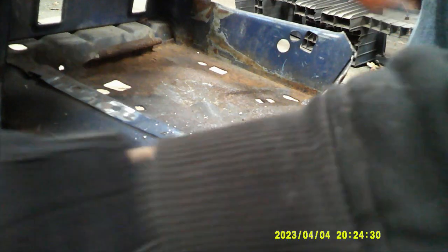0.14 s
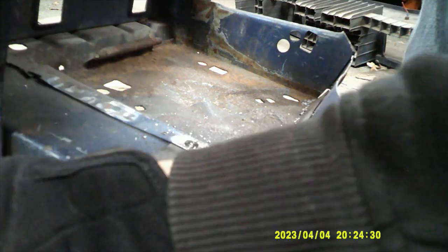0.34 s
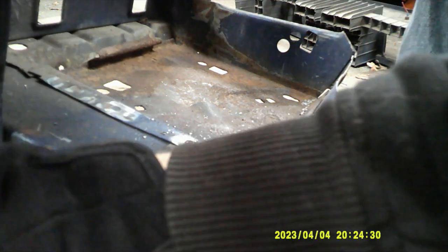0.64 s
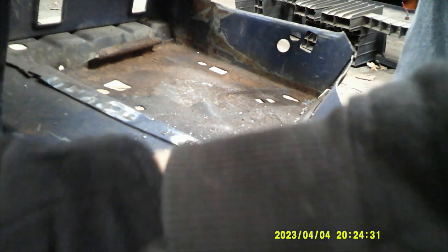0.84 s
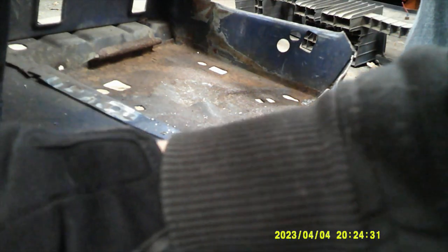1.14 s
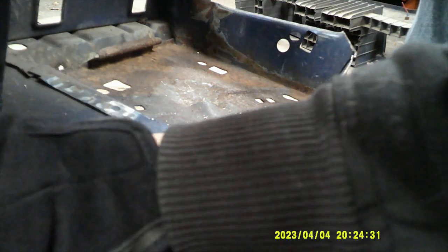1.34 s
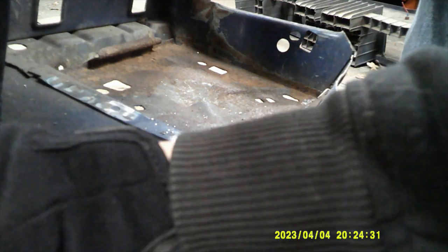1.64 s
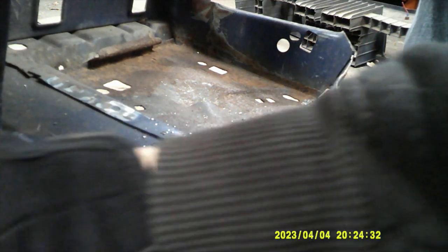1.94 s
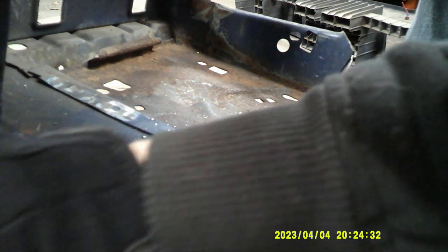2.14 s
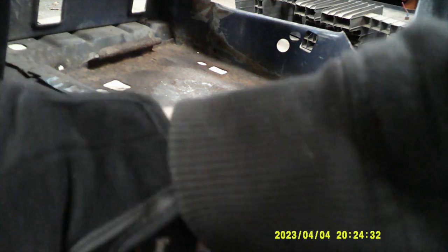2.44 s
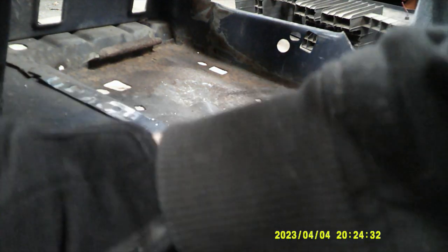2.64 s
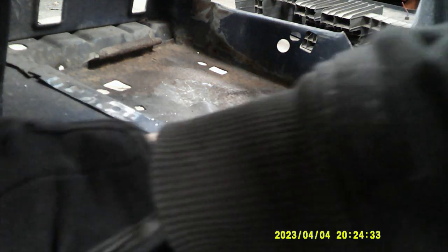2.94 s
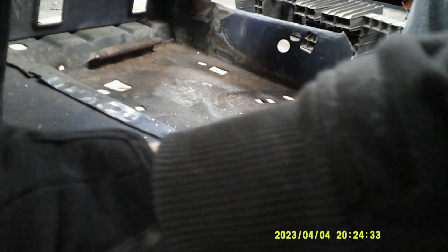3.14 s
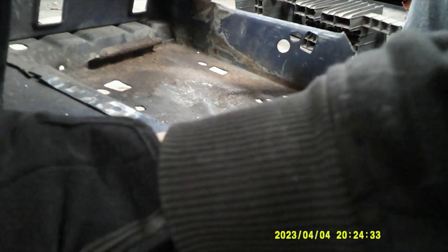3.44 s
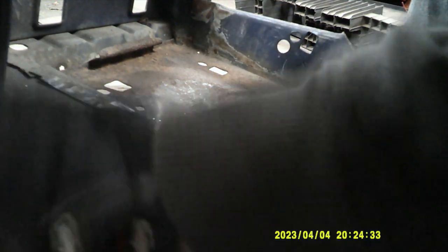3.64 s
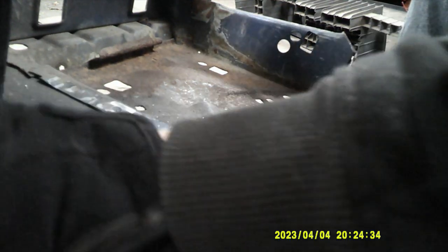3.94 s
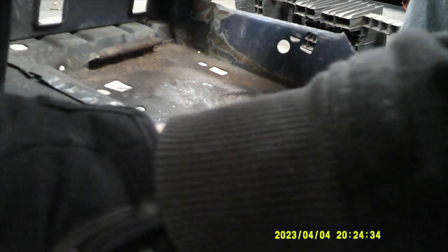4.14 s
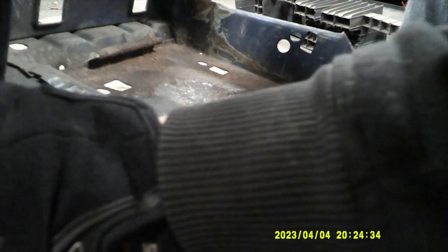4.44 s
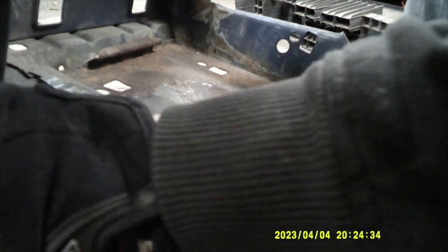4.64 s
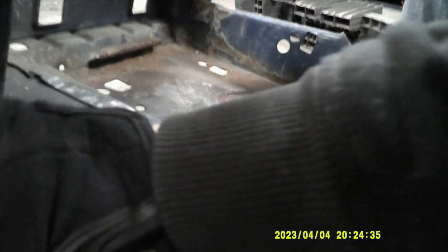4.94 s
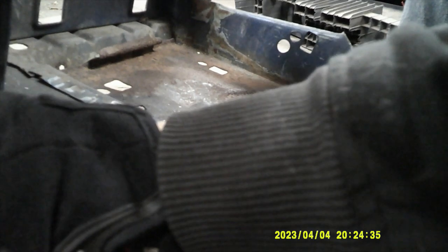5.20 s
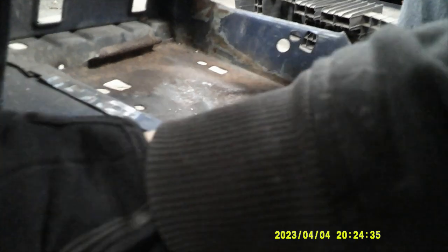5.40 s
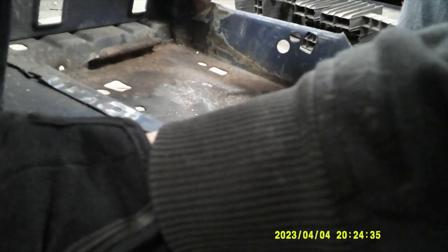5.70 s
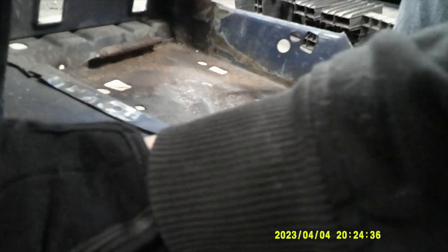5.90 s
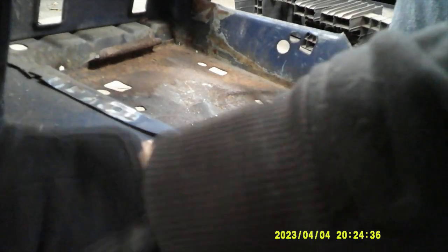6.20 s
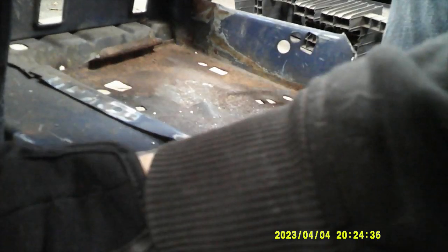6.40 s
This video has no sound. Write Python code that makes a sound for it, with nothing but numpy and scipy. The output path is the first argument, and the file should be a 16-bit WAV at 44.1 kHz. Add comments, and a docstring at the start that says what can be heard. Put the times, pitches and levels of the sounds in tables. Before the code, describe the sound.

A soft swish of cloth leads into scattered metallic taps and brief scratches as a chisel is positioned on a steel panel. About halfway through, eight loud hammer blows follow, a little over two a second. The first crack sharply; the later ones ring fuller as the chisel bites into the seam and rattles. The close microphone overloads a little, and a short workshop echo follows each strike.

```python
"""Hammer and chisel on welded panels

A steel chisel is set, tapped and dragged on sheet metal in a garage, close up; sleeves brush softly.
Then eight hammer blows drive it into a seam: steel cracks on steel, the wedged chisel rattles and the
panels clang and ring, loud enough to clip the converter and pull down a limiter."""
import sys
import numpy as np
from scipy import signal
from scipy.fft import rfft, irfft
from scipy.io import wavfile
from scipy.ndimage import uniform_filter1d

SR = 44100
rng = np.random.default_rng(int(sys.argv[2]) if len(sys.argv) > 2 else 0)


def wrap_up_sound(samples):
    """Save the sound to the file named by the first command line argument, as 16-bit audio."""
    columns = np.atleast_2d(samples).T
    # keep every value between -1 and 1, then stretch to whole-number steps
    tamed = np.clip(columns, -1, 1)
    steps = np.round(tamed * 32767).astype(np.int16)
    wavfile.write(sys.argv[1], SR, steps)


N = 289327

# free chisel: (frequency [Hz], level [dB], t60 [s])
CHISEL_MODES = [(1121, -16.5, 0.092), (1223, -6, 0.17), (1305, -15, 0.11), (1945, -14, 0.052),
                (2897, -15, 0.07), (3150, -20.5, 0.098), (5110, -29, 0.031), (6700, -37, 0.065),
                (6900, -23, 0.046)]
# steel-on-steel crack: (frequency [Hz], level [dB], t60 [s])
CRACK_MODES = [(2280, 8.5, 0.0055), (4480, -0.5, 0.011), (6200, -2, 0.094), (7000, -10.5, 0.039)]


def hammer_blows():
    """Each blow: a crack, the sheet's clang, the wedged chisel's rattle, panel modes swelling behind."""
    # (time [s], strength [dB], crack [dB], wedged chisel [dB], favoured pitch [Hz], its boost [dB])
    blows = [(3.315, 9, -1, -20, 865, 7), (3.640, 10.5, -10.5, -3.5, 2040, 3),
             (4.118, 10.5, -8.5, -13.5, 1350, 2), (4.483, 11.5, -13, -6.5, 1630, 3.5),
             (4.896, 13.5, -18, -14.5, 840, 2), (5.315, 12.5, -24, -6.5, 1300, 1.5),
             (5.777, 13, -17, -1, 1410, 3), (6.182, 15.5, -37, 0, 1015, 7.5)]
    # welded panels: (frequency [Hz], level [dB], t60 [s])
    panel_modes = [(151.2, -16.5, 1.29), (202, -1.5, 0.27), (291, -11, 0.48), (319, -9.5, 0.68),
                   (374, 4.5, 0.42), (402, -6.5, 1.17), (419.5, -1, 0.97), (464.3, -2.5, 1.45),
                   (557, -21.5, 0.26), (644, -1, 0.47), (660, -1, 0.67), (781, 3, .45), (835, 2.5, .4),
                   (965, -17, 0.39), (986, 1.5, 0.29), (1110, -17, 0.42), (1210, -2.5, 0.32),
                   (1315, -8, 0.74), (1430, -3.5, 0.29), (1523, -9.5, 0.57), (1670, -22.5, 1.5),
                   (1782, 1.5, 0.45)]
    out = np.zeros(N)
    ends_s = [row[0] for row in blows[1:]] + [N / SR]
    for k, ((start_s, db, crack_db, chisel_db, hz, boost_db), end_s) in enumerate(zip(blows, ends_s)):
        looseness = 0.22 ** k  # the chisel bites deeper with each blow
        length = np.interp(looseness, [0, 1], [.99, .74])
        tilt_db_oct = np.interp(looseness, [0, 1], [3.5, 2])
        panel_db = db + np.interp(k, [0, 3.4], [-20.5, -13])  # full grip after 3.4 blows
        add(out, start_s, amp(crack_db) * ring(CRACK_MODES, 0.13, spread_db=1.0, rise_s=0.00073))
        add(out, start_s, amp(db) * clang(length, tilt_db_oct, hz, boost_db, bass_rise_s=0.021))
        add(out, start_s, amp(chisel_db) * chisel_rattle())
        panel = ring(struck_at(panel_modes, hz, boost_db), .6, spread_db=1.2, rise_s=0.054)
        left_s = end_s - start_s - np.arange(len(panel)) / SR
        handover = np.clip(1 + left_s / 0.025, 0, 1)  # the next blow starts the ring afresh
        add(out, start_s, amp(panel_db) * panel * handover)
    return out


def clang(length, tilt_db_oct, centre_hz, boost_db, bass_rise_s):
    """Dense modes of sheet and garage: noise dying band by band, bass arriving late; length scales t60."""
    # (frequency [Hz], density [dB])
    spectrum = [(59, -71), (100, -47.5), (142, -25), (388, -3.5), (466, -0.5), (613, -4), (648, -3),
                (1590, -14), (1770, -13), (3300, -24), (4350, -34.5), (6630, -27), (7960, -49),
                (10300, -94.5), (17500, -120)]
    # (frequency [Hz], base t60 [s])
    decay = [(150, 1), (400, 0.39), (1000, 0.54), (2000, 0.52), (3500, 0.66), (7000, 0.53)]
    size = round(1.3 * np.clip(length, .1, 1) * SR)
    hz, t, bands = signal.stft(noise(size, spectrum, lines_db=2.0), SR, nperseg=256, noverlap=192)
    hz = hz[:, None]
    patches = uniform_filter1d(rng.standard_normal(bands.shape), size=3, axis=0)
    patches_db = 2.0 * unit_rms(uniform_filter1d(patches, size=30, axis=1))
    rise = 1 - np.exp(-(t + 0.00015) * (hz + 100) / (1000 * bass_rise_s))
    colour_db = tilt_db_oct * np.log2(hz / 1000 + 0.12) + favour_db(hz, centre_hz, boost_db) + patches_db
    bands = bands * rise * amp(colour_db - 60 * t / (length * lookup(decay, hz)))
    return signal.istft(bands, SR, nperseg=256, noverlap=192)[1][:size]


def chisel_rattle(duration_s=.55, blur_s=.011, rise_s=0.011):
    """The chisel rattles in the seam: each mode wanders in level and phase within the blur time."""
    # wedged chisel: (frequency [Hz], level [dB], t60 [s])
    wedged_modes = [(1712, -17, 0.48), (2280, -7, 0.5), (3100, -8.5, 0.66), (3280, -0.5, 0.57),
                    (3383, 2.5, 0.56), (4280, -10.5, 0.71), (5160, -16, 0.41), (6580, -4.5, 0.53)]
    hz, db, t60 = np.transpose(wedged_modes)[:, :, None]
    t = np.arange(round(duration_s * SR)) / SR
    shake = rng.standard_normal((2, len(wedged_modes), len(t)))
    width = round(blur_s * SR)
    sin_gain, cos_gain = unit_rms(uniform_filter1d(uniform_filter1d(shake, width), width))
    phase = 2 * np.pi * hz * t
    blurred = sin_gain * np.sin(phase) + cos_gain * np.cos(phase)
    return (amp(db - 60 * t / t60) * blurred).sum(0) * (1 - np.exp(-t / rise_s))


def chisel_knocks():
    """Light knocks: the chisel ticks, rings briefly and stirs the floor pan under it."""
    # (time [s], chisel [dB], clang [dB], floor pan [dB], length [factor], tilt [dB/octave],
    #  favoured pitch [Hz], its boost [dB])
    knocks = [(0.2215, -5, -20, -36, 0.21, 8.5, 403, 22), (0.329, -30, -35, -50, 0.11, 5.5, 6660, 11),
              (0.3675, -54, -32.5, -71, 0.064, -16.5, 900, 30), (.546, -33, -48, -53, .15, 7, 6030, 5),
              (0.686, -26, -35, -55, .2, 7.5, 604, 5), (0.7054, -21, -28, -38.5, .3, 4, 590, 20),
              (0.763, -3, -29, -41, .32, 4, 600, 0), (0.819, -3.5, -16, -46, 0.34, -2, 560, -2),
              (0.8886, -6.5, -6, -14, .41, -1.5, 380, -2), (.905, -26, -33, -20, .1, 1.3, 398, 16),
              (1.025, -21.5, -32, -64, .3, 3, 2920, 8), (1.106, -35, -26, -64, 0.15, 1.5, 6140, -6),
              (1.9273, 5.5, -1.5, -12, .3, 2.5, 1187, 11), (2.305, -44, -34.5, -72, .15, 6, 1660, 21),
              (2.571, -30, -28, -73, .12, 7.5, 6100, -1.1), (2.798, -47, -46, -57, .07, -2, 394, 22.5),
              (2.917, -39, -30, -42, 0.32, 7, 2680, 9), (2.926, -61, -26.5, -42.5, 0.63, 2.5, 710, 12)]
    # floor pan: (frequency [Hz], level [dB], base t60 [s])
    pan_modes = [(200.3, -21, 0.85), (284, -33, 0.99), (382, -9, 0.27), (400.6, -1, 0.34), (465, -13.5, 1.),
                 (572, -13, 0.85), (560, -18, 0.68), (640, -4.5, 0.47), (783, -16, 0.3), (822, 2, 0.22),
                 (842.3, 2.5, 0.37), (938, -4.5, 0.46), (963, -8, 0.81), (1060, -21, 0.14),
                 (1190, -22, 0.66), (1234, -1.5, 0.26), (1388, 0, 0.18), (1545, 1, 0.16), (1684, -5, 0.11),
                 (1820, -6, 0.38), (2100, -3, 0.12), (2360, -13, .18), (3060, -13, 0.14),
                 (3500, -3.5, 0.06)]
    out = np.zeros(N)
    for start_s, chisel_db, clang_db, pan_db, length, tilt_db_oct, hz, boost_db in knocks:
        add(out, start_s, amp(chisel_db) * ring(CHISEL_MODES, .25, spread_db=0.4, rise_s=0.00065))
        add(out, start_s, amp(clang_db) * clang(length, tilt_db_oct, hz, boost_db, bass_rise_s=0.0082))
        add(out, start_s, amp(clang_db - 11.5) * ring(CRACK_MODES, .06, spread_db=1.1, rise_s=0.00042))
        modes = struck_at(pan_modes, hz, boost_db, 0.5 + length, tilt_db_oct)
        add(out, start_s, amp(pan_db) * ring(modes, 1.0, spread_db=1.2, rise_s=0.00089))
    return out


def chisel_drags(slips_per_s=1000):
    """Uneven slips of the edge on rust, heard through the sheet and the chisel, which the contact damps."""
    # (start [s], rise [s], slide [s], level [dB], fade over the slide [dB], chisel's power share [0-1])
    drags = [(.672, 0.029, 0.055, -19, -1, 0.84), (.80, 0.023, 0.047, -20.5, -5, 0.53),
             (2.232, 0.016, 0.091, -28, -7, 0.37), (2.852, .02, 0.18, -35, -9, 0.07)]
    damped_modes = struck_at(CHISEL_MODES, 7000, 3.9, length=.45, tilt_db_oct=0.5)
    out = np.zeros(N)
    for start_s, rise_s, slide_s, db, fade_db, share in drags:
        gain = stroke(rise_s, slide_s, db, fade_db)
        size = len(gain)
        strengths = amp(3.5 * np.minimum(rng.exponential(1, size), 3.5)) * rng.choice([-1, 1], size)
        slips = unit_rms(strengths * (rng.random(size) < slips_per_s / SR)) * gain
        chisel = ring(damped_modes, .1, spread_db=0, rise_s=0.00018)
        sheet = clang(length=0.1, tilt_db_oct=0.48, centre_hz=1100, boost_db=4.9, bass_rise_s=0.013)
        add(out, start_s, np.sqrt(share) * resonate(slips, chisel))
        add(out, start_s, np.sqrt(1 - share) * resonate(slips, sheet))
    return out


def sleeves():
    """Cloth brushing: soft swishes of noise."""
    # (start [s], rise [s], slide [s], level [dB], fade over the slide [dB])
    brushes = [(0, .08, 0.094, -31, -7), (3.161, 0.062, .03, -43, -9), (3.252, 0.048, .02, -40, -2)]
    # (frequency [Hz], density [dB])
    spectrum = [(250, -14), (420, -3), (800, -4), (1300, 3), (3000, 1.5), (4900, -10.5), (6300, -3),
                (8000, -22), (12000, -34)]
    out = np.zeros(N)
    for start_s, *shape in brushes:
        gain = stroke(*shape)
        add(out, start_s, noise(len(gain), spectrum) * gain)
    return out


def garage_echo(x, level_db=-15.5, delay_s=.008):
    """Walls and shelves: a noise tail that dies band by band."""
    decay = [(150, 1.6), (1000, 0.59), (4000, 0.55), (8000, 0.52)]  # (frequency [Hz], t60 [s])
    hz, t, bands = signal.stft(rng.standard_normal(SR), SR, nperseg=256)
    envelope = amp(-60 * t / lookup(decay, hz)[:, None]) * (t > delay_s)
    tail = signal.istft(bands * envelope, SR, nperseg=256)[1]
    return amp(level_db) * resonate(x, tail)[:N]


def garage_air(level_db=-44.5):
    """The garage's quiet: faint steady noise."""
    # (frequency [Hz], density [dB])
    spectrum = [(20, -7), (68, -9.5), (148, -6.5), (330, -9.5), (480, -1.5), (650, -8), (1280, -12.5),
                (2800, -15.5), (4900, -26), (6400, -20.5), (8000, -28.5), (12000, -40.5)]
    return amp(level_db) * noise(N, spectrum)


def ring(modes, duration_s, spread_db, rise_s):
    """Dying sines; level and phase of each vary from strike to strike."""
    hz, db, t60 = np.transpose(modes)[:, :, None]
    t = np.arange(round(duration_s * SR)) / SR
    level_draw, phase_draw = rng.standard_normal((2, len(modes), 1))
    envelopes = amp(db + spread_db * level_draw - 60 * t / t60)
    sines = np.sin(2 * np.pi * hz * t + np.pi * phase_draw)
    return (envelopes * sines).sum(0) * (1 - np.exp(-t / rise_s))


def struck_at(modes, centre_hz, boost_db, length=1, tilt_db_oct=0):
    """Modes as stirred from one place: boosted near a pitch, tilted, t60 scaled by length."""
    return [(hz, db + favour_db(hz, centre_hz, boost_db) + tilt_db_oct * np.log2(hz / 1000), t60 * length)
            for hz, db, t60 in modes]


def favour_db(hz, centre_hz, boost_db, width_oct=0.17):
    """Bell of gain around the pitch that a struck place favours."""
    return boost_db * np.exp(-.5 * (np.log2((hz + 1) / centre_hz) / width_oct) ** 2)


def stroke(rise_s, slide_s, db, fade_db, lift_s=0.033, edge_db=-13):
    """Gain of a rubbing stroke: swells, slides while fading, lifts off."""
    marks_s = np.cumsum([0, rise_s, slide_s, lift_s])
    t = np.arange(0, marks_s[-1], 1 / SR)
    return amp(db + np.interp(t, marks_s, [edge_db, 0, fade_db, fade_db + edge_db]))


def noise(size, spectrum, lines_db=0, line_width_hz=18):
    """Shaped noise of rms 1, optionally lumped into narrow lines at random pitches."""
    hz = np.fft.rfftfreq(size, 1 / SR)
    width = max(1, round(line_width_hz * size / SR))
    lines = unit_rms(uniform_filter1d(rng.standard_normal(len(hz)), width))
    gain = amp(lookup(spectrum, hz) + lines_db * lines)
    return unit_rms(irfft(rfft(rng.standard_normal(size)) * gain, size))


def resonate(x, response):
    """Convolve with a response scaled to unit energy."""
    return signal.fftconvolve(x, response / np.linalg.norm(response))


def lookup(points, hz):
    """Interpolate (frequency [Hz], value) on a log-frequency axis."""
    points_hz, values = np.transpose(points)
    return np.interp(np.log(hz + 1), np.log(points_hz + 1), values)


def amp(db):
    return 10 ** (np.asarray(db) / 20)


def unit_rms(x):
    return x / np.sqrt(np.mean(x ** 2) + 1e-20)


def add(mix, start_s, sound):
    part = mix[round(start_s * SR):][:len(sound)]
    part += sound[:len(part)]


def scene():
    """Steel and its echo over garage air and sleeves; mono."""
    steel = hammer_blows() + chisel_knocks() + chisel_drags()
    return (steel + garage_echo(steel) + garage_air() + sleeves())[None]


def record(dry):
    """Peaks clip at the converter's ceiling, a limiter pulls them down; thinned bass, band limit."""
    ceiling, bass_hz, edge_hz = .79, 134, 7950
    limit_db, attack_s, release_db_per_s = -5.5, 0.0013, 11.1
    clipped = np.clip(dry, -ceiling, ceiling)
    pole = np.exp(-1 / (attack_s * SR))
    power_db = 10 * np.log10(signal.lfilter([1 - pole], [1, -pole], clipped[0] ** 2) + 1e-12)
    release_db = np.arange(N) * release_db_per_s / SR
    reduction_db = np.maximum.accumulate(np.maximum(power_db - limit_db, 0) + release_db) - release_db
    limited = clipped / amp(reduction_db)
    bass = signal.oaconvolve(limited, signal.firwin(2047, bass_hz, fs=SR)[None], "same")
    lowpass = signal.firwin(255, edge_hz, window=("kaiser", 8), fs=SR)
    return signal.oaconvolve(limited - 0.39 * bass, lowpass[None], "same")


dry = scene()
out = record(dry)
wrap_up_sound(out)
```